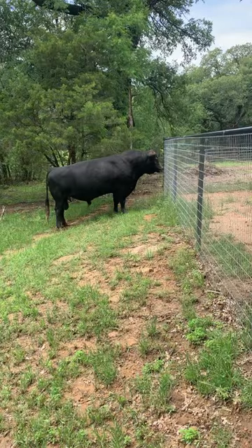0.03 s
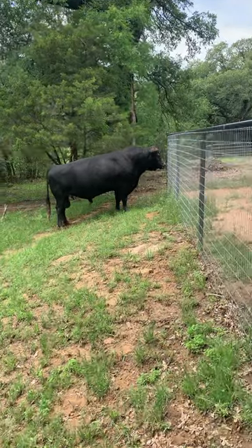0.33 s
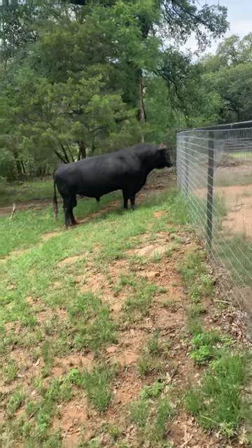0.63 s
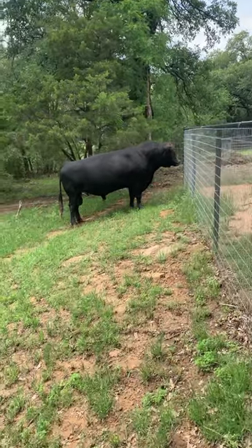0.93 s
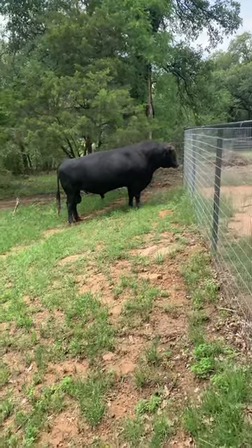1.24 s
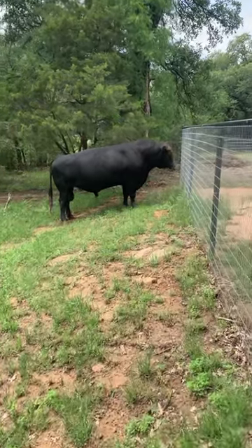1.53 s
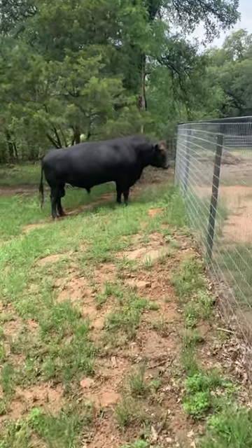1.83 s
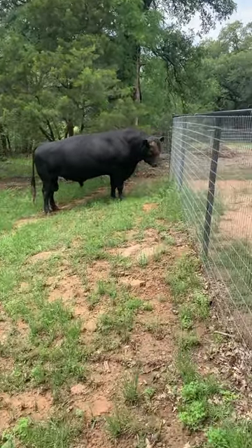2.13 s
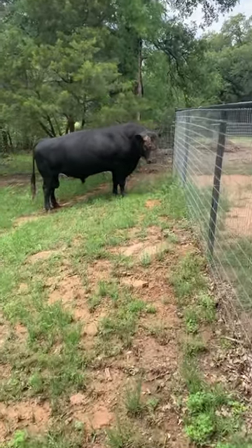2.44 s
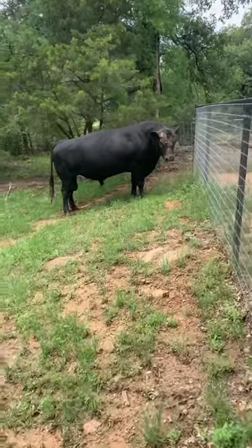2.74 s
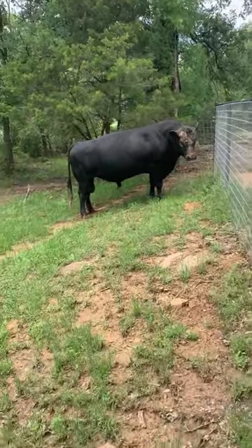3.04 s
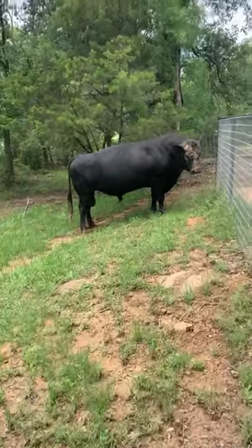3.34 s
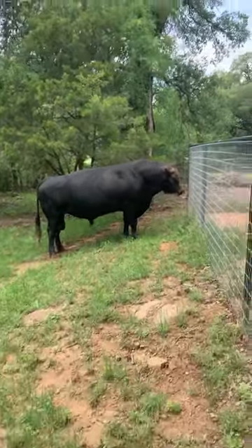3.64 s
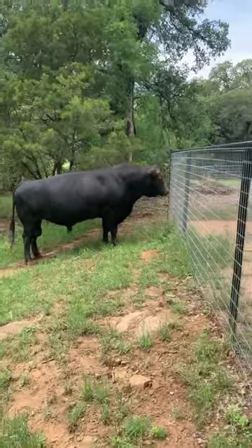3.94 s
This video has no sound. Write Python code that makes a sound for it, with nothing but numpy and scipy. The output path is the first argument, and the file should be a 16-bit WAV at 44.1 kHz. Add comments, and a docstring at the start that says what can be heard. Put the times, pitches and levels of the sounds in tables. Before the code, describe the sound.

A bull gives a short bellow, then a long, low, hoarse one in open air.

```python
"""A bull bellows twice in a pasture, some metres from a hand-held phone and a little to the right:
a short high call, then a long low one that grows out of a growl, opens with a hard blast of air and
closes to a hum. His vocal folds pulse and puff breath through throat and mouth; trees at the edge echo it.
Between the calls something ticks and knocks on the fence close to the microphone.
Behind it all lie a faint rumble of moving air and a thin hiss."""
import sys
import numpy as np
from scipy import signal
from scipy.fft import rfft, irfft
from scipy.io import wavfile
from scipy.ndimage import uniform_filter1d

SR = 44100
rng = np.random.default_rng(int(sys.argv[2]) if len(sys.argv) > 2 else 0)


def transcribe(signal):
    """Save signal, clipped to [-1, 1], as a 16-bit WAV file at the path in sys.argv[1]."""
    frames = np.atleast_2d(signal).T
    limited = np.clip(frames, -1, 1)
    pcm = np.round(limited * 32767).astype(np.int16)
    wavfile.write(sys.argv[1], SR, pcm)


N = 176400

# The short call. Each row: time in seconds, pitch in Hz, then levels in dB of harmonic 1, harmonic 2,
# throat band, mouth band and treble.
SHORT_CALL = [(0.04, 139.2, -46, -34, -52, -45.5, -55.5), (0.11, 142.4, -42, -37, -44.5, -64, -56.5),
              (0.15, 141.5, -40.5, -42.5, -51.5, -48.5, -53),
              (0.18, 144.2, -39.5, -39.5, -42, -51.5, -53.5), (0.31, 148.3, -41.5, -38.5, -50, -51, -55),
              (0.342, 148, -40.5, -36.5, -58.5, -44.5, -58.5),
              (0.38, 147.7, -40.5, -40.5, -47.5, -46.5, -56.5), (0.468, 148.7, -40, -41, -46.5, -43.5, -55),
              (0.556, 142.1, -45, -35, -51, -53, -55), (0.612, 131.9, -49, -35, -50, -63, -54.5),
              (0.62, 128.1, -58, -49, -56, -55, -62)]
# The long call. Each row: as above, but with harmonics 2 and 3.
LONG_CALL = [(1.5, 66.65, -71.5, -67, -71, -79, -86), (1.53, 69, -74, -58.5, -75, -85, -90),
             (1.6, 66.8, -62, -59, -63, -75.5, -93), (1.66, 69.46, -60, -55, -79, -86, -79),
             (1.71, 66.2, -65, -52, -60, -82, -73.5), (1.78, 68.9, -66, -48.5, -77, -90, -75),
             (1.82, 70.08, -46, -47, -57, -82, -62.5), (1.89, 75.34, -45.5, -44.5, -50, -55.5, -53.5),
             (1.94, 78.7, -44.5, -40.5, -49.5, -66.5, -56), (1.99, 81.33, -47, -34, -49, -55, -57),
             (2.12, 83.96, -36.5, -35.5, -53, -50, -50.5), (2.18, 85.6, -37, -33, -40, -51.5, -51.5),
             (2.24, 87.26, -34, -40, -44.5, -49, -49), (2.3, 88, -33.5, -43.5, -55, -51.5, -58.5),
             (2.37, 89.2, -34.5, -48.5, -42.5, -48, -55), (2.56, 92.34, -39.5, -41, -46, -45, -55),
             (2.65, 91.9, -39, -41.5, -43.5, -47.5, -55.5), (2.8, 90.07, -40.5, -48, -45, -62, -55),
             (2.83, 88.96, -38, -46, -47, -50, -56.5), (2.91, 88.16, -36.5, -38, -48, -52, -57),
             (2.94, 87.7, -35.5, -38, -49.5, -60, -55), (2.99, 86.54, -37.5, -33.5, -43.5, -56, -56),
             (3.08, 83.05, -39, -33.5, -47.5, -49, -60), (3.13, 80.33, -42.5, -38.5, -49, -55, -59),
             (3.21, 77.5, -44, -34, -46, -59, -58), (3.34, 77.3, -43.5, -33, -47.5, -57.5, -58.5),
             (3.44, 75.1, -47, -26, -54.5, -60.5, -64.5), (3.52, 73.12, -54, -33, -46, -57.5, -62),
             (3.66, 73.15, -46, -32, -52.5, -64.5, -61), (3.74, 71.7, -53.5, -32.5, -50, -56.5, -64),
             (3.79, 68.93, -52, -43, -56.5, -61, -65), (3.81, 71.5, -47.5, -28, -50, -66, -64),
             (3.828, 65.8, -64, -39, -49, -57.5, -66), (3.85, 65.58, -53, -35.5, -58, -61, -60.5)]
# Hoarseness. Each row: time in seconds, breathiness from 0 to 1, unevenness of the cycles from 0 to 1.
HOARSENESS = [(.04,.26,.16),(.2,.22,.12),(.28,.32,.2),(.4,.17,.08),(.5,.22,.13),(.58,.48,.4),(1.5,.5,.8),(1.9,.65,.8),(2.0,.6,.35),(2.2,.45,.25),(2.38,.17,.07),(2.65,.14,.06),(3.0,.23,.12),(3.2,.4,.18),(3.45,.5,.22),(3.73,.42,.25),(3.79,.45,.7)]
# The strongest mouth resonance, moving with jaw and head. Each row: time in seconds, centre in Hz.
MOUTH_RESONANCE = [(.04,680),(.1,974),(.14,1270),(.2,1250),(.23,1010),(.28,894),(.33,1315),(.44,1222),(.55,1560),(.62,1360),(1.9,902.7),(2.08,1156),(2.18,599),(2.28,560),(2.36,1072),(2.45,1012),(2.52,835.3),(2.62,846.4),(2.7,1000),(2.8,826),(2.9,861.8),(3.0,1102),(3.08,823),(3.2,538),(3.55,518),(3.8,600)]
# Blasts through the nostrils. Each row: start, attack, hold and release in seconds, level in dB.
NOSTRIL_BLASTS = [(1.802,0.24,0.19,0.11,-51),(3.246,0.38,0.021,0.052,-63)]
# Dry ticks close by. Each row: start in seconds, level in dB, centre in Hz.
DRY_TICKS = [(1.0785,-37,2600),(1.0852,-30,9000),(1.1285,-49,5300),(1.159,-52,1800)]
# Knocks on the fence. Each row: start in seconds, level in dB.
FENCE_KNOCKS = [(1.2212,-40),(1.229,-59),(1.364,-64)]
# The ring of the fence. Each row: frequency in Hz, gain in dB, seconds to fall by 60 dB.
FENCE_MODES = [(208,-7,0.08),(513,-3,0.076),(770,-14,0.036),(1305,-13.5,0.035),(2290,-8.5,0.02),(3000,-8.5,0.021),(4000,-3.5,0.018)]
# Rise and fall of the background. Each row: time in seconds, level in dB.
RUMBLE_LEVEL = [(0,-43),(.24,-59),(.3,-53),(.36,-58.5),(.6,-55.5),(1.0,-58.5),(1.3,-59.5),(1.41,-59.5),(1.52,-56),(2.6,-54),(4,-53.5)]
THIN_HISS_LEVEL = [(0,-68),(.5,-74),(.7,-68.5),(1.3,-75),(1.55,-73.5),(2.3,-72.5),(2.65,-75),(2.9,-70.5),(3.3,-72.5),(4,-71)]
# Tone colours. Each row: frequency in Hz, gain in dB.
SHORT_CALL_TRACT = [(300,-27.5),(440,-13),(590,-8),(735,-10),(880,-16),(1030,-4),(1180,-2.5),(1320,3.5),(1480,-4.5),(1630,-2),(1850,-15.5),(2080,-10),(2400,-16),(2680,-17.5),(3000,-27.5),(4200,-30.5),(6000,-66)]  # vocal tract with the head stretched out
LONG_CALL_TRACT = [(290,9),(365,4.5),(450,-5.5),(540,2.5),(600,0.5),(650,-11.5),(730,-8),(830,-2.5),(920,-6),(1020,0),(1100,2),(1200,-15.5),(1330,-10),(1560,-16),(1780,-12.5),(1940,-16),(2080,-17),(2280,-13),(2550,-19),(2850,-25),(3100,-32.5),(4200,-32.5)]
NOSTRIL_COLOUR = [(1500,-18.5),(2500,-11),(3800,11.5),(4650,-31.5),(5300,7.5),(6500,5.5),(9000,0.5),(11000,7.5),(13000,5),(15000,3)]  # bright hiss of a blast
THROAT_COLOUR = [(400,-22.5),(800,12),(1050,1.5),(1350,10.5),(1530,-17),(1650,6),(2050,-7.5),(2280,8.5),(2650,-12),(2850,0),(3150,-22),(4300,-49.5)]  # its rasp
FLUTTER_COLOUR = [(30,-8.5),(85,6),(180,0.5),(300,-6),(500,-4),(1000,-40)]  # its low flutter
TREE_COLOUR = [(80,-29.5),(150,0),(250,0.5),(600,10),(1200,6),(2500,5.5),(6000,-2)]
TICK_RING_COLOUR = [(900,-19),(1600,7),(3000,10),(4200,3),(6000,4),(14000,-14)]
CONTACT_COLOUR = [(600,-4),(2000,-7),(4100,8),(5000,-14),(6300,3),(9000,-26),(15000,-5)]  # crack of a knock
RUMBLE_COLOUR = [(20,-13),(45,-3),(70,0),(120,-8),(250,-4),(600,-25),(1500,-28.5),(3500,-32.5),(5000,-60)]
HISS_COLOUR = [(2500,-12.5),(4700,5),(5600,0),(6500,1.5),(9000,-2),(11300,4),(13000,0),(15000,-1)]


def bull():
    """Both calls from the right, with near scatter and tree echo, plus dry, wide nostril blasts."""
    hum, mouth = (bellow(SHORT_CALL, SHORT_CALL_TRACT, edges_hz=(280, 900, 1700, 4500), lowest=1)
                  + bellow(LONG_CALL, LONG_CALL_TRACT, edges_hz=(280, 700, 1500, 4500), lowest=2))
    near = undb(-9) * scatter(mouth, [(300, -4), (700, 6.5), (3000, 13)], t60_s=.06, build_s=.0041)
    trees = undb(-12.5) * scatter(hum + mouth, TREE_COLOUR, t60_s=1.03, build_s=.05)
    direct = from_right(hum, lag_s=.00024) + from_right(mouth, lag_s=.00013)
    # The phone widens the mouth sound in stereo, most around 600 Hz.
    side = .63 * colour(mouth, [(350, -13.5), (600, 2.5), (1100, -5), (2500, -9)])
    return direct + np.array([-side, side]) + nostril_blasts() + near + trees


def bellow(call, tract, edges_hz, lowest):
    """Vocal fold pulses: returns a hum of low harmonics, and the rest with breath through the tract."""
    hz, *levels = curves(call)
    gains = undb(levels)
    breath, uneven = curves(HOARSENESS)
    phase = 2 * np.pi * np.cumsum(hz * (1 + .035 * uneven * wander(82.5))) / SR
    start, end = call[0][0], call[-1][0]
    gate = np.interp(clock(), [start - .008, start, end, end + .025], [0, 1, 1, 0])
    shimmer = undb(4 * uneven * wander(70))
    hum = gains[0] * np.sin(lowest * phase) + gains[1] * np.sin((lowest + 1) * phase)
    if lowest > 1:  # a faint fundamental under the strong pair
        hum = hum + undb(-25) * gains[1] * np.sin(phase)
    pulses = sum(undb(overtone_db(k * hz)) * np.cos(k * phase) for k in range(lowest + 2, 20 * lowest))
    puffs = rng.standard_normal(N) * puffing(phase)
    clean, hoarse = colour(pulses, tract), colour(puffs, tract)
    breath_weights = (.85, 1.05, 1.8)  # throat band, mouth band, treble
    mouth = 0
    for low, high, gain, weight in zip(edges_hz, edges_hz[1:], gains[2:], breath_weights):
        band = signal.butter(4, (low, high), "band", fs=SR, output="sos")
        tone, air = steady(signal.sosfilt(band, [clean, hoarse]))
        air_share = np.clip(breath * weight, 0, .9)
        mouth = mouth + gain * (np.sqrt(1 - air_share ** 2) * tone + air_share * air)
    return np.array([np.sqrt(2) * hum, mouth]) * gate * shimmer


def overtone_db(hz, lift_db=12, half_width_hz=90, waver_db=4.2, wavers_per_s=13):
    """An overtone swells as it meets the mouth resonance, and wavers slowly on its own."""
    detuning = (hz - curves(MOUTH_RESONANCE)[0]) / half_width_hz
    waver = np.interp(clock() * wavers_per_s, np.arange(128), rng.standard_normal(128))
    return lift_db / (1 + detuning ** 2) + waver_db * waver


def puffing(phase, sharpness=1.3):
    """Air escapes in one puff per cycle of the folds."""
    return unit(np.exp(sharpness * np.cos(phase)))


def nostril_blasts():
    """Air forced through nose and throat: hiss, a rasp chopped by the straining folds, a low flutter."""
    envelope = sum(undb(db) * np.interp(clock(), start + np.cumsum([0, attack, hold, release]),
                                        [0, 1, 1, 0])
                   for start, attack, hold, release, db in NOSTRIL_BLASTS)
    fold_hz = curves(LONG_CALL)[0] * (1 + .15 * wander(60))
    chop = np.sqrt(puffing(2 * np.pi * np.cumsum(fold_hz) / SR))
    rasp = undb(3.5 + 3.6 * wander(160)) * chop * wide_noise(THROAT_COLOUR, side=.45)
    hiss = undb(1.3 * wander(70)) * wide_hiss(NOSTRIL_COLOUR)
    flutter = undb(4) * wide_noise(FLUTTER_COLOUR, side=.11)
    return envelope * (hiss + rasp + flutter)


def ticks(decay_s=.0006):
    """Tiny snaps near the microphone, each a burst of about a millisecond with a brief ring."""
    snaps = 0
    for start, db, hz in DRY_TICKS:
        age = clock() - start
        envelope = undb(db) * (age > 0) * np.exp(-abs(age) / decay_s)
        snaps = snaps + envelope * noise([(hz / 4, -16), (hz, 0), (hz * 3, -16)])
    return snaps + undb(-12) * scatter(snaps, TICK_RING_COLOUR, t60_s=.04, build_s=.0018)


def fence_knocks(crack_s=.0018):
    """Light blows on the fence close by: a crack of contact, a few short modes and a soft echo."""
    blows = 0
    for start, db in FENCE_KNOCKS:
        age = np.clip(clock() - start, 0, 1)
        crack = undb(db - 9) * (age > 0) * np.exp(-age / crack_s) * noise(CONTACT_COLOUR)
        ring = sum((-1) ** k * undb(db + mode_db - 60 * age / t60_s) * np.sin(2 * np.pi * hz * age)
                   for k, (hz, mode_db, t60_s) in enumerate(FENCE_MODES))
        blows = blows + crack + ring
    echo = scatter(blows, [(200, -13), (600, 10.5), (4000, 2)], t60_s=.6, build_s=.0029)
    return blows + undb(-14) * echo


def pasture_air():
    """The open pasture all round: a low rumble of moving air and a thin hiss."""
    rumble = wide_noise(RUMBLE_COLOUR, side=.69) * undb(curves(RUMBLE_LEVEL)[0] + 2 * wander(16))
    hiss = wide_hiss(HISS_COLOUR) * undb(curves(THIN_HISS_LEVEL)[0])
    return rumble + hiss


def scatter(x, points, t60_s, build_s):
    """Diffuse reflections that build up and die away, unrelated left and right."""
    t = clock()
    envelope = undb(-60 * t / t60_s) * (1 - np.exp(-t / build_s))
    tails = [colour(unit(rng.standard_normal(N) * envelope), points) / np.sqrt(N) for _ in range(2)]
    return np.array([signal.fftconvolve(x, tail)[:N] for tail in tails])


def from_right(x, lag_s):
    """Sound from the right reaches the left microphone port later."""
    return np.array([np.interp(clock() - lag_s, clock(), x), x])


def wide_hiss(points, lag_s=.000226):
    """Hiss as the phone widens it, the right channel inverted and slightly late."""
    left = noise(points)
    right = -np.interp(clock() - lag_s, clock(), left)
    return np.array([left, right]) + .05 * wide_noise(points, side=1)


def wide_noise(points, side):
    """Coloured stereo noise; more side makes it wider."""
    return noise(points) + side * noise(points) * np.array([[1], [-1]])


def noise(points):
    """Coloured noise of rms 1."""
    return unit(colour(rng.standard_normal(N), points))


def colour(x, points, size=4096):
    """Minimum-phase filter through (Hz, dB) points."""
    hz, db = np.array(points, float).T
    log_hz = np.log(np.fft.rfftfreq(size, 1 / SR) + 1)
    cepstrum = irfft(np.log(undb(np.interp(log_hz, np.log(hz), db))))
    cepstrum[1:size // 2] *= 2
    cepstrum[size // 2 + 1:] = 0
    return signal.fftconvolve(x, irfft(np.exp(rfft(cepstrum))))[:len(x)]


def wander(per_s):
    """Smooth random drift of rms 1."""
    span = int(SR / per_s)
    return unit(uniform_filter1d(uniform_filter1d(rng.standard_normal(N), span), span))


def steady(x):
    """Hold the short-term rms at 1, leaving the single pulses intact."""
    return x / np.sqrt(np.abs(uniform_filter1d(x ** 2, size=2600)) + 1e-12)


def curves(table):
    """Each column after the time, joined by straight lines."""
    times, *columns = np.array(table, float).T
    return [np.interp(clock(), times, column) for column in columns]


def unit(x):
    """Scale to rms 1."""
    return x / np.sqrt(np.mean(x ** 2) + 1e-20)


def undb(db):
    """Decibels to gain."""
    return 10 ** (np.asarray(db) / 20)


def clock():
    """Time of every sample in seconds."""
    return np.arange(N) / SR


def scene():
    """The bull some metres off, small sounds close by, the air of the pasture behind."""
    return bull() + fence_knocks() + ticks() + pasture_air()


def record(dry, open_s=.0343, top_hz=16000):
    """The phone's microphone opens, hears the bass more alike on both sides and cuts the top."""
    mid, side = (dry[0] + dry[1]) / 2, (dry[0] - dry[1]) / 2
    bass_band = signal.butter(2, (120, 380), "band", fs=SR, output="sos")
    side = side - .5 * signal.sosfiltfilt(bass_band, side)
    opened = np.clip((clock() - open_s) / .0017, 0, 1)
    top_cut = signal.ellip(8, .2, 70, top_hz, fs=SR, output="sos")
    return signal.sosfilt(top_cut, np.array([mid + side, mid - side]) * opened)


dry = scene()
out = record(dry)
transcribe(out)
```